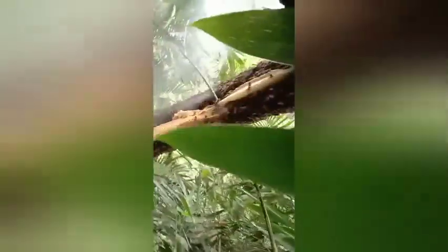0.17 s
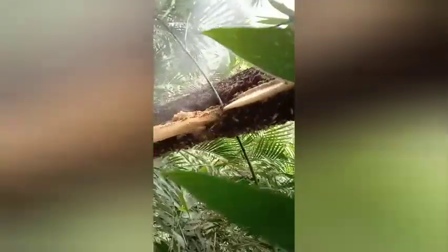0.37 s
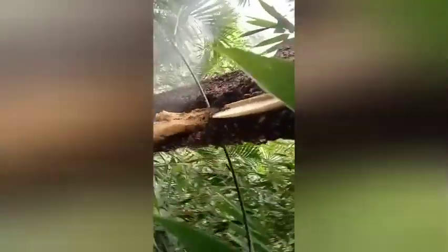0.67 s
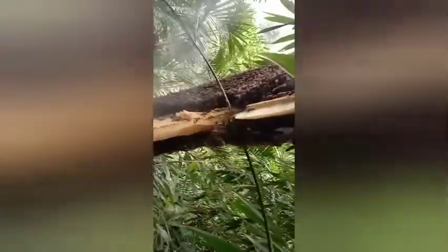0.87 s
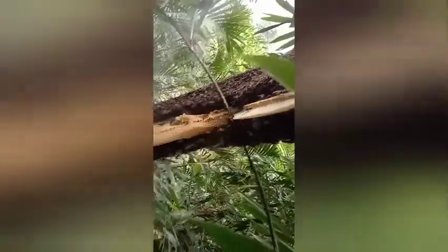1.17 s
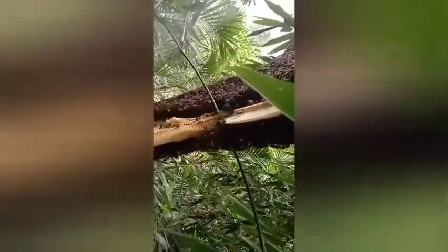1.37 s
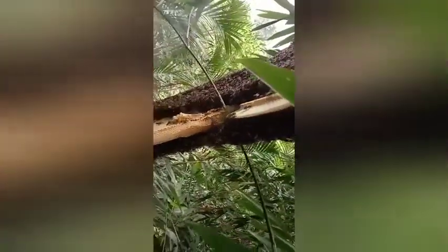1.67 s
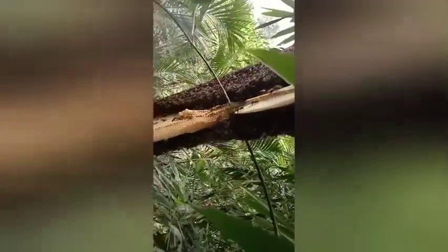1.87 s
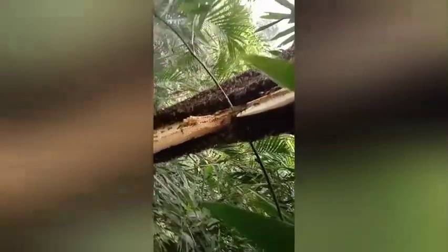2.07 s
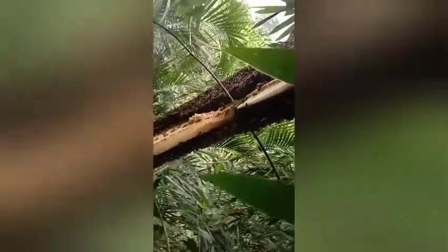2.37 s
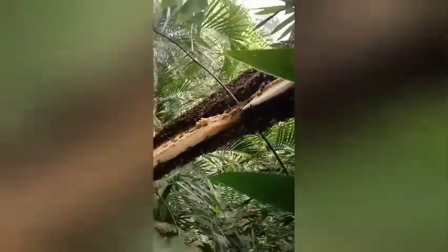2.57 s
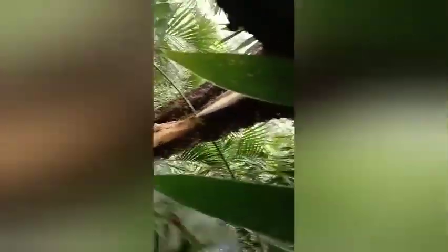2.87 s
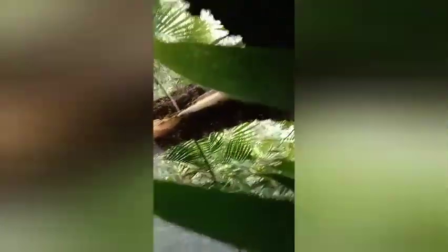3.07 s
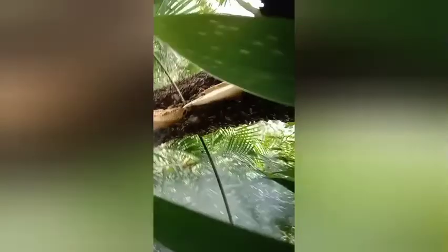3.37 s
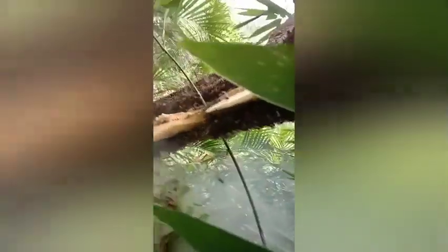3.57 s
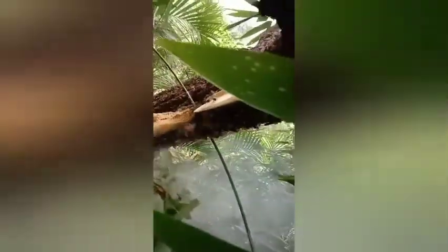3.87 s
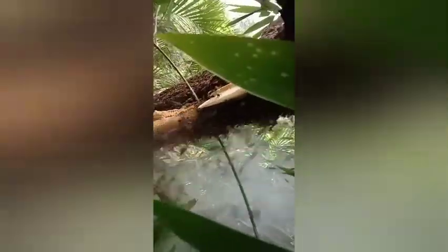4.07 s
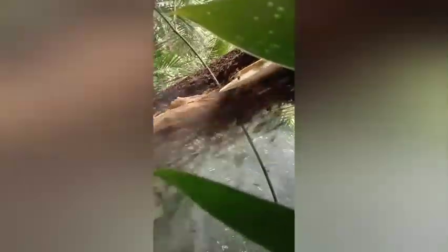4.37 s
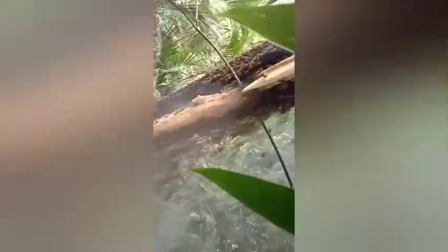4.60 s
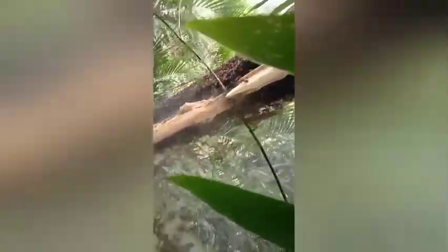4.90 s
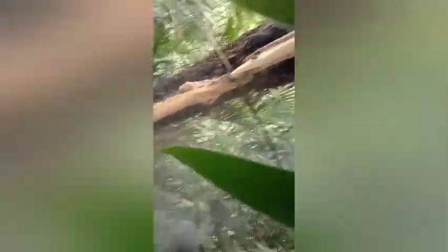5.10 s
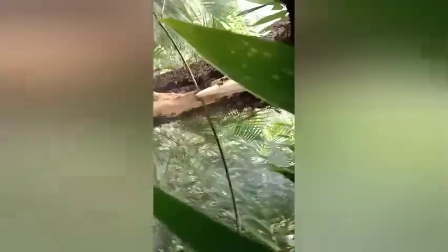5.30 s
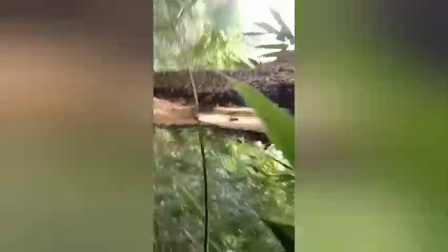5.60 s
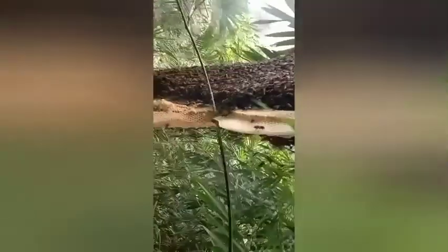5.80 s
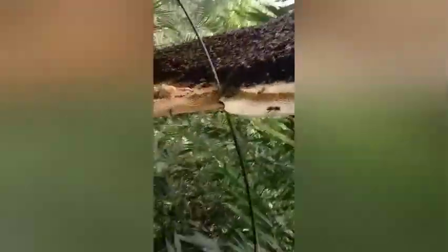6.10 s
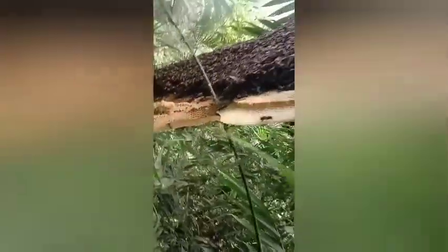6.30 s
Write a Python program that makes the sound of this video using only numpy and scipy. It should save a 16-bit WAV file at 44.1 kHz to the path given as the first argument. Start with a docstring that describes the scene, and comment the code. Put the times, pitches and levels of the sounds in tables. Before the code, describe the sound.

A large bee colony hums and hisses outdoors around a branch among leaves, with single bees passing close and twigs crackling. The buzz calms midway, leaving ticks of brushed leaves and a couple of dull handling knocks on the small, close microphone. Then the swarm surges much louder. One hard thump lands near the end as the bees slowly ease.

```python
"""A large bee colony hums and hisses round an open comb among leaves. Near bees sound their wingbeat;
the mass of wings blurs into hiss. Leaves and twigs crackle close by. The colony calms; from 2.5 s
brushed leaves tick and dull knocks travel through the hand to the small microphone.
At 4 s the bees rise in a cloud. The hardest knock lands at 5.3 s as the swarm eases."""
import sys
import numpy as np
from scipy import signal
from scipy.fft import rfft, irfft, next_fast_len
from scipy.io import wavfile
from scipy.ndimage import uniform_filter1d

SR = 44100
rng = np.random.default_rng(int(sys.argv[2]) if len(sys.argv) > 2 else 0)


def store_pcm(level_fs):
    """Save levels as 16-bit WAV."""
    pcm = np.round(np.clip(level_fs, -1, 1) * 32767).astype(np.int16)
    wavfile.write(sys.argv[1], SR, np.atleast_2d(pcm).T)


N = 284356

# colony activity: t/s, hiss/dB, buzz/dB, near-wing rush/dB
ACTIVITY = [(0.0, -42, -46.5, -63), (0.48, -44.5, -46.5, -63), (0.86, -46, -46.5, -67.5),
            (1.17, -44, -46.5, -59), (1.49, -45, -45.5, -65.5), (1.87, -47, -50, -68.5),
            (2.28, -51, -52, -64.5), (2.73, -51.5, -62.5, -75), (2.89, -52.5, -61, -74.5),
            (3.32, -53.5, -61.5, -76.5), (3.54, -50.5, -56, -72), (3.79, -47, -50, -72.5),
            (4.13, -35, -37.5, -49.5), (4.31, -30, -32.5, -42.5), (4.47, -30.5, -32.5, -45),
            (5.49, -33.5, -34.5, -43.5), (6.14, -38.5, -38.5, -49), (6.45, -40, -39, -50)]
# buzz spectra (many bees, few bees, low band): f/Hz, level/dB
BUSY_BUZZ_SPECTRUM = [(500, -61), (850, -6.5), (1370, -2.5), (1740, -7.5), (2050, -14), (2300, -18),
                      (2990, -30), (5060, -120)]
CALM_BUZZ_SPECTRUM = [(500, -65), (950, -16), (1250, 3), (1500, 2), (1850, -1), (2200, -14.5), (2990, -40)]
LOW_BUZZ_SPECTRUM = [(290, -4), (340, -3), (440, -1.5), (520, 3), (760, -0.5), (900, -16), (1050, -10)]
# air spectra (massed wings, near wings, low stir): f/Hz, level/dB
HISS_SPECTRUM = [(2530, -89), (4300, -43), (4930, -7), (5540, 0.5), (9390, -11), (14900, -1.5),
                 (15700, -1.5), (16000, -17)]
NEAR_SPECTRUM = [(1180, -31), (2000, -6), (2530, 0.5), (3290, -1.5), (3960, -7.5), (4700, -3), (6110, -72),
                 (10300, -120)]
STIR_SPECTRUM = [(15, -18), (45, -14), (70, 1), (110, 4), (200, 14.5), (350, 8.5), (500, -8)]
# single bees passing: nearest t/s, length/s, tone/dB, octave/dB, wingbeat f/Hz
FLYBYS = [(0.177, 0.21, -64, -48, 128), (0.471, .1, -71, -49.5, 126.3), (0.707, 0.16, -82, -46.5, 130),
          (0.863, 0.09, -59, -60, 134), (1.05, 0.16, -48.5, -80, 125), (1.365, .09, -75, -55, 144),
          (1.425, 0.073, -63, -73, 140.5), (1.56, 0.15, -87, -50.5, 127.8),
          (1.703, 0.11, -83, -51.5, 132.6), (2.059, .1, -81, -60.5, 131.4), (2.272, .2, -76, -54, 128),
          (3.8, 0.1, -58, -86, 128), (3.921, .1, -46, -52, 131.7), (4.197, 0.16, -52, -35.5, 131.2),
          (4.457, 0.19, -39, -39, 132.7), (4.606, .18, -45, -37.5, 132), (4.75, .14, -52.5, -35, 126.7),
          (4.916, .12, -46, -41.5, 122.7), (5.0, 0.13, -52, -35, 127.5), (5.138, .19, -48, -36.5, 131),
          (5.538, 0.098, -64, -35, 129), (5.679, .22, -51, -38.5, 132.2), (5.82, .14, -72, -44, 132),
          (6.173, 0.083, -73, -51.5, 124), (6.348, 0.16, -75, -55, 131)]
# leaf and twig crackles: t/s, low rustle/dB, ring/dB, high rustle/dB, ring f/Hz, length/s
LEAF_CRACKLES = [(0.411, -37, -44, -44, 2800, 0.082), (0.464, -34.5, -31, -35, 2990, 0.012),
                 (0.473, -37, -41, -44, 2370, 0.036), (0.697, -35.5, -47.5, -51, 3000, 0.087),
                 (0.914, -48, -46, -56, 3260, 0.016), (0.927, -29, -33.5, -32, 3040, 0.013),
                 (1.26, -53, -45, -45, 2870, 0.038), (1.328, -43, -43, -38, 4740, 0.04),
                 (1.454, -64, -49, -64, 3880, 0.04), (1.764, -37.5, -50, -42, 2900, 0.043),
                 (2.072, -62, -65, -34, 3045, 0.0084), (2.08, -31, -53, -34, 2620, 0.0084),
                 (2.207, -42, -60, -53, 3230, 0.083), (2.529, -44.5, -58, -37, 2760, 0.11),
                 (2.545, -50, -55, -34, 2650, 0.005), (2.571, -60, -46, -30, 4460, 0.007),
                 (2.574, -45, -42, -47, 2230, 0.058), (2.594, -45, -47, -43, 2380, 0.13),
                 (2.651, -62, -46.5, -35, 3500, 0.012), (2.661, -67, -57, -33, 3750, 0.0068),
                 (2.748, -47, -52, -60, 2480, 0.032), (2.776, -54, -61, -32.5, 2520, 0.0068),
                 (3.111, -52, -50.5, -36, 2950, 0.06), (3.313, -48, -54, -42, 2780, 0.054),
                 (3.412, -49, -57, -51, 2760, 0.08), (3.469, -60, -66, -31.5, 2250, 0.0067),
                 (3.766, -58, -51, -31, 2385, 0.0089), (4.869, -27, -26.5, -24.5, 3450, 0.0096),
                 (5.311, -28, -29, -31, 3500, 0.031), (5.357, -41, -27, -27, 2650, 0.011),
                 (5.484, -40, -33, -25, 2730, 0.014), (6.079, -23.5, -35, -51, 2570, 0.025)]
# crackle spectra (low rustle, twig scrape, high rustle): f/Hz, level/dB
LEAF_LOW_SPECTRUM = [(600, -60), (900, -10), (1400, -2.5), (1900, -9.5), (2300, -47)]
TWIG_SPECTRUM = [(1700, -28), (2100, -10), (3200, -15.5), (4200, -20), (5200, -4.5), (5800, -13)]
LEAF_HIGH_SPECTRUM = [(4400, -46), (5200, -2.5), (6000, 1), (9300, -3.5), (12500, -6.5), (15000, 5.5),
                      (16000, -6)]
# knock swings, one or more a blow: t/s, level/dB, start f/Hz, end f/Hz, rise/s, swell exponent, polarity
KNOCK_SWINGS = [(2.722, -58, 470, 450, 0.0074, 1.5, 1), (2.824, -52, 520, 477, 0.0057, 1.8, 1),
                (2.719, -47, 130, 100, 0.003, 1.6, 1), (2.8225, -24.3, 110, 88, .010, 2.5, -1),
                (3.1545, -31.5, 86, 86, .014, 3.5, -1), (5.2557, -5.6, 300, 66, .0033, 1.8, 1),
                (5.2557, -18, 300, 66, .010, 2, 1), (5.2597, -10, 684, 497, 0.00024, 1.86, 1),
                (5.306, -30, 128.3, 90, 0.0085, 1.8, -1)]


def amp(db):
    return 10 ** (np.asarray(db) / 20)


def unit_rms(x):
    return x / np.sqrt(np.mean(x ** 2) + 1e-20)


def activity_db(t):
    """Hiss, buzz and near-wing levels at times t."""
    times, *levels = np.transpose(ACTIVITY)
    return [np.interp(t, times, db) for db in levels]


def follow(leader_db, full_db, slope):
    """Gain tracking another layer; full_db at full swarm (leader at -32 dB)."""
    return amp(full_db + slope * (leader_db + 32))


def coloured(x, spectrum):
    """x filtered by an (f/Hz, level/dB) table, rms 1."""
    size = next_fast_len(len(x))
    hz, db = np.transpose(spectrum)
    shape_db = np.interp(np.log(np.fft.rfftfreq(size, 1 / SR) + 1), np.log(hz), db, -90, -90)
    return unit_rms(irfft(rfft(x, size) * amp(shape_db), size)[:len(x)])


def wander(hz, count, t):
    """Slow random curves, rms near 1, rates up to roughly hz."""
    f = np.geomspace(hz / 20, hz, 12)[:, None]
    coarse_s = np.arange(0, t[-1] + .01, .005)
    waves = [(np.sin(2 * np.pi * (f * coarse_s * u[:, :1] + u[:, 1:])) / f ** .25).sum(0)
             for u in rng.uniform(.7, 1.7, (count, 12, 2))]
    return np.array([np.interp(t, coarse_s, unit_rms(w)) for w in waves])


def blur(field, frames, bins):
    return unit_rms(uniform_filter1d(uniform_filter1d(field, frames, axis=1), bins, axis=0))


def patchy(x, depth, flicker_db):
    """x with drifting spectral patches and wide-band flicker, rms 1."""
    t, spectra = signal.stft(x, SR, nperseg=1024, noverlap=768)[1:]
    narrow, flicker, broad = rng.standard_normal((*spectra.T.shape, 3)).T
    patches = .89 * blur(narrow, 9, 3) + .35 * blur(broad, 20, 10)
    hiss_db = activity_db(t)[0]
    depth_db = depth * (1 - .055 * (hiss_db + 31))  # quieter passages: more blotchy and warbling
    bias_db = depth_db ** 2 * np.log(10) / 20
    gain = amp(depth_db * patches - bias_db + flicker_db * blur(flicker, 5, 200))
    return unit_rms(signal.istft(spectra * gain, nperseg=1024, noverlap=768)[1][:N])


def wingbeats(count, mean_hz=130, spread=.075, drift=.03, swing_db=4.5):
    """Bees fly in and out, each on its own drifting beat: tone, octave, upper partials."""
    step = 8
    t = np.arange(N // step + 2) * step / SR
    beat_hz = mean_hz * (1 + spread * rng.standard_normal((count, 1)) + drift * wander(3, count, t))
    turns = np.cumsum(beat_hz, axis=1) * step / SR + rng.random((count, 1))
    nearness = amp(swing_db * wander(6, count, t))
    cycle = np.arange(512) / 512
    stroke = sum(np.cos(2 * np.pi * (k * cycle + rng.random())) for k in range(3, 18))
    parts = np.cos(2 * np.pi * turns), np.sin(4 * np.pi * turns), stroke[(turns * 512).astype(int) % 512]
    return [unit_rms(signal.resample_poly((nearness * p).sum(0), step, 1)[:N]) for p in parts]


def wing_buzz(partials, buzz_db, hiss_db, air_share=.69, calm_db=-65.5, busy_db=-42.5):
    """Wingbeat partials plus turbulent air; thinner when few fly."""
    turbulence = coloured(rng.standard_normal(N), [(200, 0), (2600, 0)])
    beating = np.sqrt(1 - air_share) * partials + np.sqrt(air_share) * turbulence
    busy = np.clip((buzz_db - calm_db) / (busy_db - calm_db), 0, 1)
    full, thin = coloured(beating, BUSY_BUZZ_SPECTRUM), coloured(beating, CALM_BUZZ_SPECTRUM)
    upper = patchy(busy * full + (1 - busy) * thin, depth=2, flicker_db=.36)
    low = patchy(coloured(beating, LOW_BUZZ_SPECTRUM), depth=2.77, flicker_db=.92)
    return amp(buzz_db) * upper + follow(hiss_db, full_db=-40, slope=1.206) * low


def wing_hiss(hiss_db, near_db, contacts_per_s=350):
    """Rush of massed and near wings, with tiny wing and leg contacts."""
    sizes = amp(3.5 * np.minimum(rng.exponential(1, N), 4))
    contacts = sizes * (rng.random(N) < contacts_per_s / SR)
    puffs = signal.lfilter([1], [1, -.97], contacts)  # about 1 ms each
    scratch = unit_rms(puffs * rng.standard_normal(N))
    rush = rng.standard_normal(N) + amp(-8) * scratch
    near = patchy(coloured(rush, NEAR_SPECTRUM), depth=2.85, flicker_db=1)
    massed = patchy(coloured(rush, HISS_SPECTRUM), depth=1, flicker_db=.82)
    return amp(hiss_db) * massed + amp(near_db) * near


def air_stir(hiss_db):
    """Low stir of air, tracking the hiss."""
    return follow(hiss_db, full_db=-51, slope=1) * coloured(rng.standard_normal(N), STIR_SPECTRUM)


def wing_hum(tone, octave, buzz_db):
    """Wingbeat tone and octave, tracking the buzz."""
    return (follow(buzz_db, full_db=-54.5, slope=.82) * tone
            + follow(buzz_db, full_db=-47.5, slope=.88) * octave)


def flybys(tone, octave, own_share=.4, sag=.02):
    """A passing bee swells and fades within its neighbours' hum; its pitch sags."""
    out = np.zeros(N)
    waver = .02 * wander(25, 1, np.arange(N) / SR)[0]
    own, others = np.sqrt(2 * own_share), np.sqrt(1 - own_share)
    for (s, length_s, tone_db, octave_db, hz), offset in zip(FLYBYS, rng.random(len(FLYBYS))):
        at = np.arange(max(round((s - length_s / 2) * SR), 0), min(round((s + length_s / 2) * SR), N))
        position = np.clip(2 * (at / SR - s) / length_s, -1, 1)
        beat_hz = hz * (1 - sag * position + waver[at])
        phase = 2 * np.pi * (offset + np.cumsum(beat_hz) / SR)
        low = others * tone[at] + own * np.cos(phase)
        high = others * octave[at] + own * np.sin(2 * phase)
        swell = abs(np.cos(np.pi / 2 * position)) ** 1.2
        out[at] += swell * (amp(tone_db) * low + amp(octave_db) * high)
    return out


def crackles(rows):
    """Leaves and twigs: quick start, ragged tail; a woody ring between low and high rustle."""
    out, t = np.zeros(N), np.arange(4000) / SR
    low, scrape, high = (coloured(rng.standard_normal(N + len(t)), band)
                         for band in (LEAF_LOW_SPECTRUM, TWIG_SPECTRUM, LEAF_HIGH_SPECTRUM))
    ragged_db = 2.5 * unit_rms(uniform_filter1d(rng.standard_normal(N + len(t)), size=60))
    ragged = unit_rms(amp(ragged_db))
    for s, low_db, ring_db, high_db, hz, length_s in rows:
        at = round(s * SR)
        span = slice(at, at + len(t))
        attack = 1 - np.exp(-t / (.08 * length_s))
        envelope = attack * amp(-30 * t / max(length_s, .003)) * ragged[span]
        mode = signal.iirpeak(hz, Q=9, fs=SR)
        grit = rng.standard_normal(len(t))
        ring = .76 * unit_rms(signal.lfilter(*mode, signal.lfilter(*mode, grit))) + .9 * scrape[span]
        rustle = amp(low_db) * low[span] + amp(high_db) * high[span]
        out[span] += (envelope * (amp(ring_db) * ring + rustle))[:N - at]
    return out


def brushed_leaves(count=34, start_s=2.45, end_s=3.8):
    """Faint random ticks, as rows for crackles()."""
    u = rng.random((count, 6))
    times_s = start_s + (end_s - start_s) * u[:, 0]
    levels_db = np.array([-62, -68, -47]) - 1.6 * np.log(1 - u[:, 1:4])
    ring_hz = 2300 + 1200 * u[:, 4]
    length_s = .008 * (.5 + u[:, 5])
    return np.column_stack([times_s, levels_db, ring_hz, length_s]).tolist()


def hand_knocks(glide_s=.005):
    """Dull swings carried through the hand; most sink in pitch as they swell and die."""
    out, t = np.zeros(N), np.arange(4000) / SR
    for s, db, start_hz, end_hz, rise_s, exponent, polarity in KNOCK_SWINGS:
        hz = end_hz + (start_hz - end_hz) * np.exp(-t / glide_s)
        swell = (t / rise_s * np.exp(1 - t / rise_s)) ** exponent
        swing = np.sin(2 * np.pi * np.cumsum(hz) / SR)
        out[round(s * SR):][:len(t)] += polarity * amp(db) * swell * swing
    return out


def scene():
    """Bees, leaves and knocks, mono."""
    hiss_db, buzz_db, near_db = activity_db(np.arange(N) / SR)
    tone, octave, partials = wingbeats(count=16)
    bees = wing_buzz(partials, buzz_db, hiss_db) + wing_hiss(hiss_db, near_db) + air_stir(hiss_db)
    bees += wing_hum(tone, octave, buzz_db) + flybys(tone, octave)
    return (bees + crackles(LEAF_CRACKLES + brushed_leaves()) + hand_knocks())[None]


def record(dry):
    """Faint rumble of the electronics, then the band limit."""
    rumble = amp(-98) * coloured(rng.standard_normal(N), [(8, -8), (20, 3), (60, 6), (90, -20)])
    lowpass = signal.firwin(1023, cutoff=15620, window=("kaiser", 9), fs=SR)
    return signal.oaconvolve(dry + rumble, lowpass[None], "same")


dry = scene()
out = record(dry)
store_pcm(out)
```